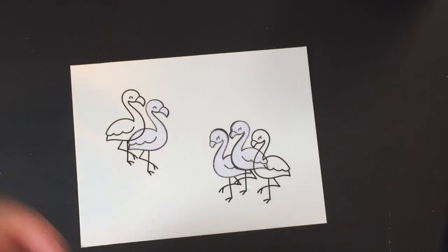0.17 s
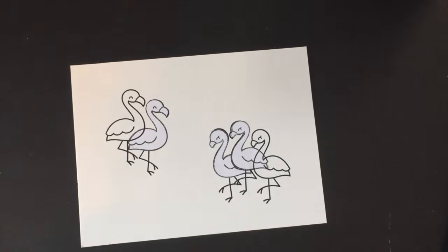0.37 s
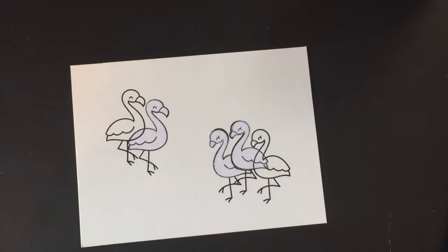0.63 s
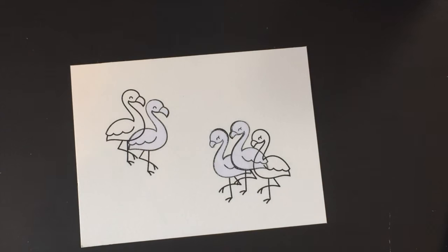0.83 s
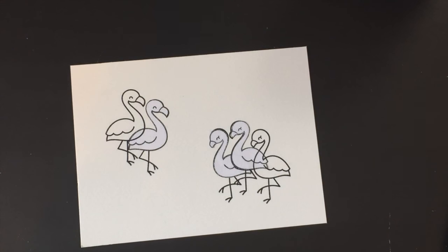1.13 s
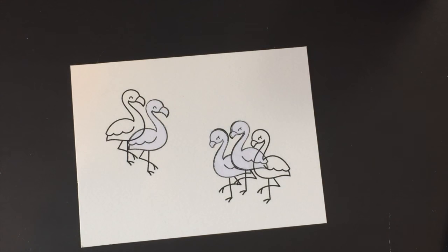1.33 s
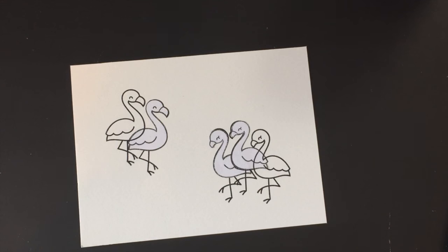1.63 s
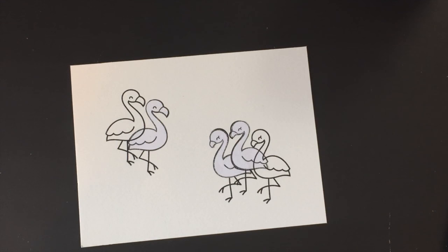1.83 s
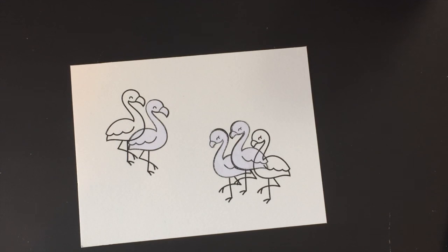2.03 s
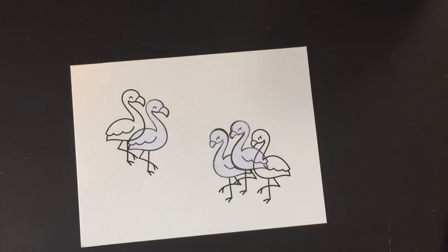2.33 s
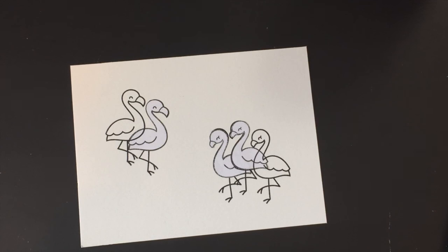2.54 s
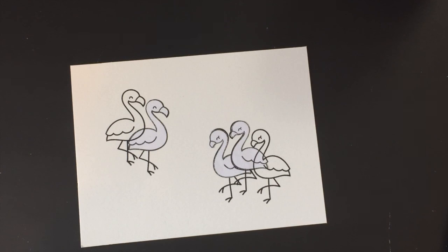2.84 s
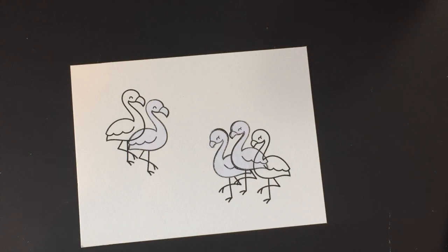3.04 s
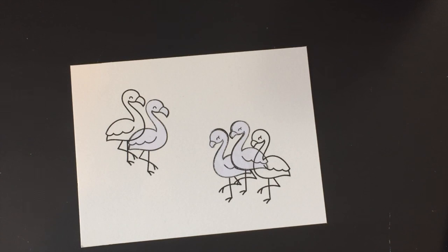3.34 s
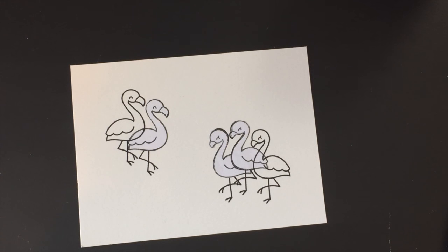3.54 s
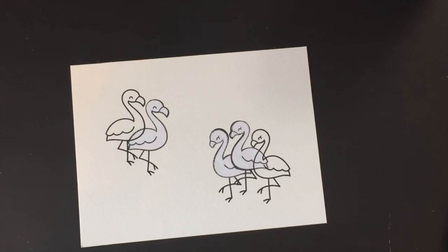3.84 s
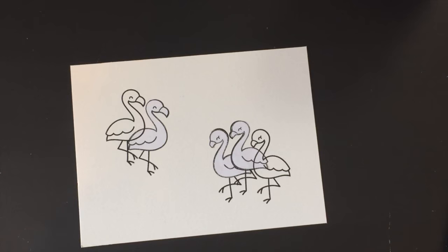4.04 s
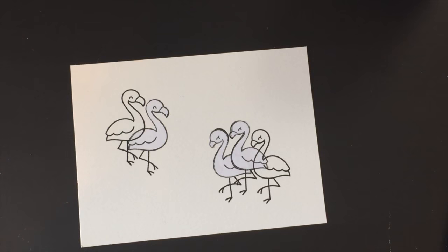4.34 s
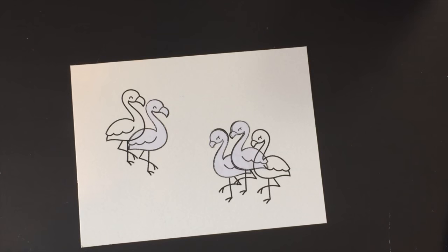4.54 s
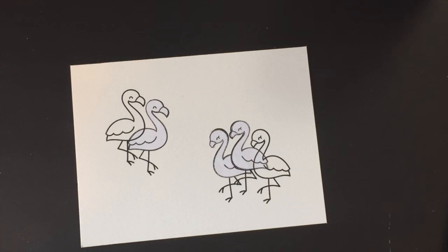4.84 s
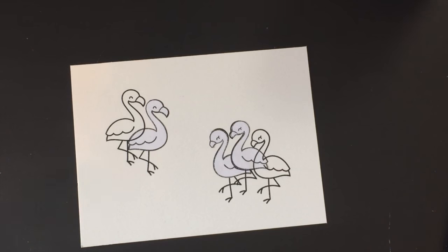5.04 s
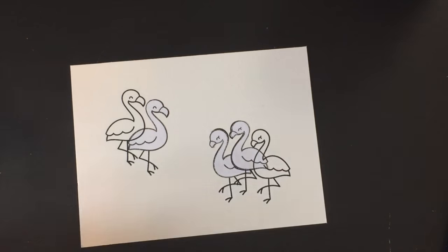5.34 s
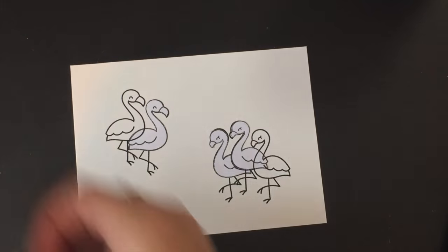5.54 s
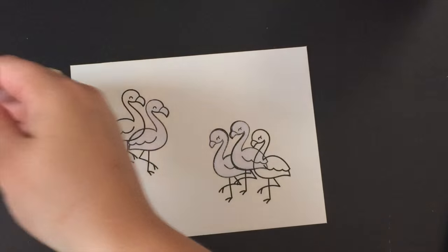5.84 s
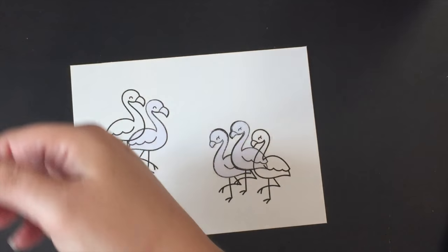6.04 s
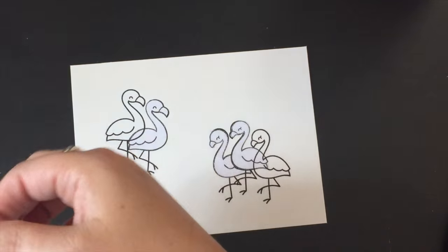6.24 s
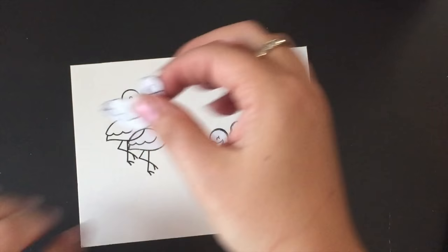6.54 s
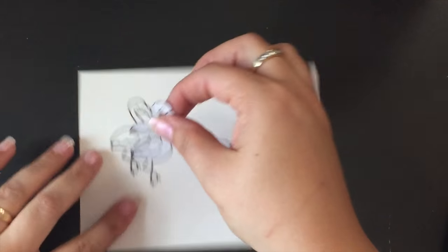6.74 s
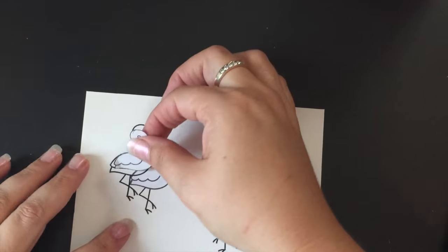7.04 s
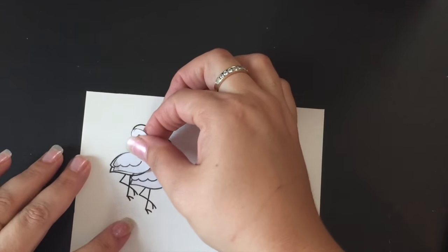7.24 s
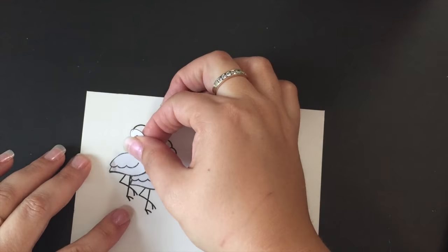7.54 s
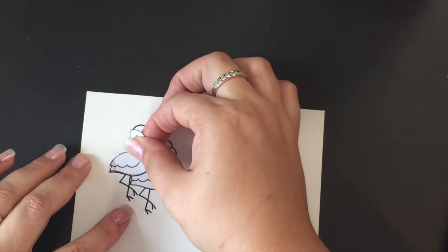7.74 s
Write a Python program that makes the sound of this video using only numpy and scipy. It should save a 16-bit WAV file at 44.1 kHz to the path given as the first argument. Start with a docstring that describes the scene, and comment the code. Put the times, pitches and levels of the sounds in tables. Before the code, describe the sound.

A deep hum of two distant motors throbs about five times a second over soft rumble and faint hiss in a quiet room. Close to a small microphone, a bright paper swish comes early, then mostly only tiny ticks. Around five seconds a small hard tool clicks and knocks sharply; later, sticky paper cut-outs peel with a quick crackle, followed by a bump and light brushing.

```python
"""Paper crafts in a humming room

Two distant motors hum about five hertz apart and throb together, over mains buzz, a drone, rumble and hiss.
Close by, hands work with sticky paper cut-outs: filtered noise makes the sharp snaps and brushing swishes.
Fading sine waves make the knocks of a small tool and two soft bumps on the desk.
A small microphone with gain control turns itself down after the loudest snaps."""
import sys
import numpy as np
from scipy import signal
from scipy.fft import rfft, irfft
from scipy.io import wavfile
from scipy.ndimage import uniform_filter1d

SR = 44100
rng = np.random.default_rng(int(sys.argv[2]) if len(sys.argv) > 2 else 0)


def transcribe(signal):
    """Save signal, clipped to [-1, 1], as a 16-bit WAV file at the path in sys.argv[1]."""
    frames = np.atleast_2d(signal).T
    limited = np.clip(frames, -1, 1)
    pcm = np.round(limited * 32767).astype(np.int16)
    wavfile.write(sys.argv[1], SR, pcm)


N = 347508
TIME = np.arange(N) / SR   # seconds

# shape of the building's rumble, on a relative scale: [f/Hz, level/dB]
RUMBLE_SHAPE = [(20, -11), (38, -7), (46, -15), (68, 4), (82, -2), (91, -3.5), (105, -1), (122, -2),
                (135, -12.5), (200, -13.5), (330, -22.5), (420, -41.5), (700, -31.5), (1500, -42.5)]
# shape of the hiss of air and microphone, on a relative scale: [f/Hz, level/dB]
HISS_SHAPE = [(100, -30), (300, -6), (450, -1), (800, -4.5), (1500, -5.5), (4250, -8.5), (16000, -17)]
# narrow dips in the hiss: [f/Hz, width/Hz, level change/dB]
HISS_DIPS = [(4910, 350, -8.5), (7650, 580, -6), (10460, 1200, -12)]
RUMBLE_DB, HISS_DB = -49.5, -58
GUST_DB, GUST_RATE_HZ = 1.63, 5.5

# swells of a far drone: [t/s of the peak, length/s, peak level/dB]
DRONE_SWELLS = [(0.552, 0.94, -63), (1.708, 1.75, -60), (4.585, 2.8, -64), (5.386, 0.26, -65.5),
                (5.873, 0.4, -60.5), (7.087, 0.76, -59), (7.88, .3, -65)]
DRONE_STEADY_DB = -67

# middle level of the two motor tones: [t/s, slow motor level/dB, fast motor level/dB]
MOTOR_LEVELS = [(0, -38, -42), (.55, -48, -51), (1.05, -45.5, -43), (1.4, -41.5, -45.5),
                (1.75, -39.5, -40.5), (2.25, -39, -41), (2.7, -43, -42), (3.15, -46.5, -39.5),
                (3.6, -40.5, -40), (4.2, -41, -39.5), (4.7, -39.5, -38), (5.3, -46, -40),
                (5.7, -42.5, -39.5), (6.15, -42, -37), (6.6, -42, -39.5), (7.0, -40, -38.5),
                (7.5, -43, -35.5), (7.88, -40, -38)]
SLOW_HZ, FAST_HZ, MAINS_BUZZ_HZ = 54.069, 59.108, 119.83
SLOW_OCTAVE_DB, FAST_OCTAVE_DB, MAINS_BUZZ_DB = -57.5, -55.5, -55
TONE_WAVER_DB, TONE_WAVER_RATE_HZ = 1.0, 3.0
OCTAVE_WAVER_DB, OCTAVE_WAVER_RATE_HZ = 4, 1.8
BUZZ_IN_STEP_S = .45   # buzz and the fast motor's octave swell together here, then every .62 s

# heel of the hand on the desk: [t/s, level/dB added to every desk mode, softness f/Hz]
BUMPS = [(.0, -26.5, 294), (6.771, -36.5, 510)]
# ringing modes of the desk: [f/Hz, relative level/dB, time to fade by 60 dB/s]
DESK_MODES = [(66.5, -8, 0.1), (113, 9, 0.17), (167, -10, 0.1), (215, -3, 0.06), (295, 2, 0.06),
              (400, -6, 0.05), (700, -6, 0.05)]

# fingers brushing paper: [t/s of the peak, rise/s, fall/s, peak level/dB, centre f/Hz, width/octaves]
SWISHES = [(.583, 0.06, 0.025, -45, 8500, 0.45), (.57, .06, .04, -50, 13500, .5),
           (.59, .04, .018, -52, 4600, 1.6), (.595, 0.008, 0.006, -46, 3900, 0.35),
           (.6, .02, .025, -58, 7000, 2.4), (.88, 0.074, .07, -63, 10000, 2.7),
           (1.21, .06, .07, -61, 11000, 1.8), (4.458, 0.03, 0.04, -59, 8500, 2.1),
           (4.595, .05, 0.06, -55, 13000, 0.75), (5.112, 0.032, .018, -54, 6000, 1.8),
           (5.171, 0.018, 0.016, -40, 6000, 3.5), (5.52, .1, .09, -55.5, 2700, 1.2),
           (5.52, .045, .03, -59, 2750, .35), (5.748, 0.034, .027, -49, 10100, 1.5),
           (5.89, 0.022, .02, -55, 12500, .9), (6.39, .05, .05, -54.5, 800, 1.8),
           (6.37, .03, .07, -57, 2600, 1.3), (6.393, .02, .022, -49, 8500, 2.2),
           (6.865, .075, .12, -45, 8500, 1.8), (6.86, .04, .08, -52.5, 3200, 1.5),
           (7.075, 0.06, 0.055, -57.5, 11500, 1.3), (7.197, 0.032, 0.03, -57, 11000, 1.5),
           (7.43, 0.08, 0.07, -57.5, 10000, 1.8)]
GRAIN_DB, GRAIN_RATE_HZ = 1.5, 250

# touches of a small tool: [t/s, level/dB added to every tool mode]
KNOCKS = [(4.9462, -51), (5.164, -44), (5.1672, -38), (5.1697, -33)]
# ringing modes of the tool: [f/Hz, middle relative level/dB, time to fade by 60 dB/s]
TOOL_MODES = [(400, -9, .03), (540, -6, 0.025), (625, -7, 0.045), (860, -9, 0.03), (1240, -4, .03),
              (1750, -3, 0.025), (2020, -5, 0.03), (2343, -5, 0.08), (2443, -12, 0.09), (2720, 8, 0.014),
              (2910, -2, 0.04), (3150, 0, 0.025), (3420, -6, 0.041), (4830, -14, 0.05), (6600, 1.5, 0.018)]
TOOL_SPREAD_DB, TOUCH_RISE_S = 3.3, 0.00035

# snaps of paper and plastic: [t/s, level/dB without the tail, centre f/Hz, width/octaves, rise/s]
SNAPS = [(.097, -54, 9000, 2.1, 0.0026), (0.115, -52, 2190, 1.2, 0.0027), (1.083, -39, 11500, 1.5, 0.002),
         (1.796, -55, 9000, 2.1, 0.0011), (2.614, -54, 9000, 2.7, 0.00092),
         (3.33, -57.5, 1340, 0.31, 0.0038), (4.23, -55, 13000, 1.4, .003), (4.295, -58, 13000, 1.2, 0.0027),
         (4.938, -42, 4500, 3.9, 0.0023), (4.9461, -28.5, 12500, 1.1, 0.0004),
         (4.9462, -30.5, 3050, 0.6, 0.0005), (4.9497, -38, 2800, .6, .001), (5.1104, -44, 5500, 1.3, 0.001),
         (5.1162, -36, 13000, .9, .0008), (5.111, -48, 940, .5, .004), (5.119, -44.5, 766, 0.66, 0.0041),
         (5.116, -34, 5700, 1.6, 0.00088), (5.1641, -29, 10000, 1.8, 0.0004),
         (5.1676, -28, 9000, 2.2, .0008), (5.1695, -29, 3430, 3, 0.0015), (5.1714, -28, 10500, 1.8, .0008),
         (5.1844, -34.5, 5970, 8.5, 0.0033), (5.636, -52, 1410, 0.38, 0.0069),
         (5.753, -46, 8000, 6, 0.0058), (5.876, -40.5, 8800, 0.94, 0.0012),
         (5.899, -46, 11500, 0.82, .0014), (6.36, -52.5, 4000, 1.8, 0.0049),
         (6.386, -38, 8000, 2.1, 0.0008), (6.3895, -39, 14000, .6, .001), (6.395, -39, 6000, 1.2, .0008),
         (6.398, -40, 9000, 2.4, .0008), (6.402, -41, 9000, 3, .0008), (6.4095, -31, 6500, 3.3, 0.0004),
         (6.393, -43, 11000, 1.2, 0.001), (6.4146, -32, 7000, 3.0, 0.0006),
         (6.411, -35.5, 2180, 0.29, 0.00117), (6.4195, -27, 7500, 1.8, 0.0002),
         (6.4377, -25, 7500, 2.6, .0003), (6.4378, -33, 2500, 1.6, .0004), (6.4398, -36, 4000, 2.4, .001),
         (6.765, -35, 6800, 0.42, 0.0004), (6.765, -33, 6000, 6.8, 0.0004)]
SNAP_TAIL_DB, SNAP_TAIL_T60_S = -14.5, 0.091   # level against the crack; time to fade by 60 dB

OPENING_DB, OPENING_S = -6.5, 0.34
BASS_CUT_HZ, TOP_CUT_HZ = 28, 16300


def from_db(db):
    """Turn decibels into a number to multiply the sound by."""
    return 10 ** (np.asarray(db) / 20)


def rms_one(x):
    """Scale a sound so its average strength (rms) is 1."""
    return x / np.sqrt(np.mean(x ** 2) + 1e-20)


def in_time(rows):
    """Draw straight lines between table rows, giving each column a value at every sample."""
    s, *columns = np.transpose(rows)
    return [np.interp(TIME, s, column) for column in columns]


def drift(rate_hz):
    """Random wandering around zero with a spread of about 1, up to roughly the given rate."""
    step = 50   # samples between random points
    sos = signal.butter(2, rate_hz, fs=SR / step, output="sos")
    wander = signal.sosfilt(sos, rng.standard_normal(N // step + 1001))
    points = rms_one(wander[1000:])   # skip the filter's start-up
    return np.interp(np.arange(N) / step, np.arange(len(points)), points)


def coloured(shape):
    """Steady noise with the given balance of low and high pitches, rms 1."""
    hz = np.maximum(np.arange(N // 2 + 1) * SR / N, 1)
    shape_hz, shape_db = np.array(shape).T
    colour = from_db(np.interp(np.log(hz), np.log(shape_hz), shape_db))
    return rms_one(irfft(rfft(rng.standard_normal(N)) * colour, N))


def band_noise(count, hz, octaves, lump_db=3, lump_hz=450):
    """Noise in one band, its spectrum lumpy like that of a small resonant object; rms 1."""
    half_widths = np.array([-.5, .5]) * max(octaves, .1)
    edges = np.clip(hz * 2 ** half_widths, 20, [.4 * SR, .45 * SR])
    sos = signal.butter(2, edges, "band", fs=SR, output="sos")
    noise = signal.sosfilt(sos, rng.standard_normal(count + 500))[500:]   # skip the filter's start-up
    spectrum = rfft(noise)
    spectrum_hz = np.arange(len(spectrum)) * SR / count
    lumps = np.interp(spectrum_hz / lump_hz, np.arange(100), rng.standard_normal(100))
    return rms_one(irfft(spectrum * from_db(lump_db * lumps), count))


def add(out, s, sound):
    """Mix a short sound in at time s, in seconds."""
    i = max(round(s * SR), 0)
    out[i:i + len(sound)] += sound[:N - i]


def air():
    """Smooth hiss with narrow dips, and a low rumble that comes in slight gusts."""
    gusts_db = GUST_DB * drift(GUST_RATE_HZ)
    rumble = from_db(RUMBLE_DB + gusts_db) * coloured(RUMBLE_SHAPE)
    hiss = from_db(HISS_DB) * coloured(HISS_SHAPE)
    for hz, width_hz, db in HISS_DIPS:
        b, a = signal.iirpeak(hz, hz / width_hz, fs=SR)
        narrow_part = signal.lfilter(b, a, hiss)
        hiss = hiss - (1 - from_db(db)) * narrow_part
    return rumble + hiss


def drone():
    """A far drone: noise in a narrow band that swells smoothly out of a steady level."""
    sos = signal.butter(2, [270, 380], "band", fs=SR, output="sos")
    noise = rms_one(signal.sosfilt(sos, rng.standard_normal(N)))
    swells = np.zeros(N)
    for peak_s, length_s, db in DRONE_SWELLS:
        place = np.clip((TIME - peak_s) / length_s, -.5, .5)
        swells += from_db(db) * np.cos(np.pi * place)
    return np.maximum(swells, from_db(DRONE_STEADY_DB)) * noise


def hum():
    """Each motor's rotor gives a tone and its octave; the close tones throb five times a second."""
    # both main tones waver together
    slow_db, fast_db = in_time(MOTOR_LEVELS) + TONE_WAVER_DB * drift(TONE_WAVER_RATE_HZ)
    slow_octave_db = SLOW_OCTAVE_DB + OCTAVE_WAVER_DB * drift(OCTAVE_WAVER_RATE_HZ)
    turn = 2 * np.pi * TIME
    # the rotors start in step
    slow = from_db(slow_db) * np.sin(SLOW_HZ * turn)
    slow = slow + from_db(slow_octave_db) * np.sin(2 * SLOW_HZ * turn)
    fast = from_db(fast_db) * np.sin(FAST_HZ * turn)
    fast = fast + from_db(FAST_OCTAVE_DB) * np.cos(2 * FAST_HZ * turn)
    slip = 2 * np.pi * (MAINS_BUZZ_HZ - 2 * FAST_HZ) * BUZZ_IN_STEP_S
    buzz = from_db(MAINS_BUZZ_DB) * np.cos(MAINS_BUZZ_HZ * turn - slip)
    return -np.sqrt(2) * (slow + fast + buzz)   # root two makes the levels rms


def bumps():
    """A soft push by the hand sets the low modes of the desk ringing."""
    out, t = np.zeros(N), TIME[:SR // 3]
    for s, db, soft_hz in BUMPS:
        rings = np.zeros(len(t))
        for hz, mode_db, t60 in DESK_MODES:
            rings += from_db(mode_db - 60 * t / t60) * np.sin(2 * np.pi * hz * t)
        b, a = signal.butter(1, soft_hz, fs=SR)   # lower means a duller bump
        add(out, s, -from_db(db) * signal.lfilter(b, a, rings))
    return out


def swishes():
    """Rubbing noise that swells and fades with the stroke, grainy as the skin catches."""
    out, t = np.zeros(N), TIME[:SR // 4]
    grain = from_db(GRAIN_DB * drift(GRAIN_RATE_HZ))
    for peak_s, rise_s, fall_s, db, hz, octaves in SWISHES:
        ramp = np.interp(t, [0, rise_s, rise_s + fall_s], [0, 1, 0])
        stroke = np.sin(np.pi / 2 * ramp) ** 1.8   # rounds the ramp
        add(out, peak_s - rise_s, from_db(db) * stroke * band_noise(len(t), hz, octaves))
    return out * grain


def knocks():
    """A small hard tool touches down; every touch rings its modes with new random strengths."""
    out, t = np.zeros(N), TIME[:SR // 6]
    touch = np.clip(t / TOUCH_RISE_S, 0, 1)
    for s, db in KNOCKS:
        strengths_db = rng.normal(0, TOOL_SPREAD_DB, len(TOOL_MODES))
        turns = rng.random(len(TOOL_MODES))   # where in its cycle each mode starts
        for (hz, mode_db, t60), extra_db, turn in zip(TOOL_MODES, strengths_db, turns):
            fade = from_db(db + mode_db + extra_db - 60 * t / t60)
            add(out, s, fade * np.sin(2 * np.pi * (hz * t + turn)) * touch)
    return out


def snaps():
    """Coloured noise rises in milliseconds or less and cracks off, with a weaker tail from desk and walls."""
    out, t = np.zeros(N), TIME[:SR // 8]
    for s, db, hz, octaves, rise_s in SNAPS:
        rise = np.clip(t / max(rise_s, 1e-4), 0, 1) ** 0.77
        after = np.maximum(t - rise_s, 0)
        crack = from_db(-60 * after / (.004 + 3 * rise_s))   # a slower snap also lets go more slowly
        tail = from_db(SNAP_TAIL_DB - 60 * after / SNAP_TAIL_T60_S)
        envelope = from_db(db) * rise * (crack + tail)
        add(out, s - rise_s, envelope * band_noise(len(t), hz, octaves))
    return out


def scene():
    """Everything reaches one microphone; the level starts a little lower and comes up."""
    opening_db = OPENING_DB * np.exp(-(TIME / OPENING_S) ** 2)
    background = air() + drone() + hum()
    hands = bumps() + swishes() + knocks() + snaps()
    return (from_db(opening_db) * (background + hands))[None]   # one channel


def gain_control(x, threshold_db=-39, slope=0.44, release_db_s=14):
    """Bright peaks above a threshold pull the gain down; it then creeps back by some dB per second."""
    bright = signal.sosfilt(signal.butter(2, 800, "high", fs=SR, output="sos"), x)
    power = uniform_filter1d(bright ** 2, size=440)   # averaged over 10 ms
    level_db = 10 * np.log10(power + 1e-12)
    wanted_cut_db = slope * (level_db - threshold_db)
    # hold the largest cut so far while it shrinks at the release rate
    ramp = release_db_s * TIME
    cut_db = np.maximum.accumulate(wanted_cut_db + ramp, axis=1) - ramp
    lag = np.exp(-1 / (0.032 * SR))   # the gain follows with a 32 ms lag
    smooth_cut_db = signal.lfilter([1 - lag], [1, -lag], np.maximum(cut_db, 0))
    return x * from_db(-smooth_cut_db)


def record(dry):
    """The microphone cuts the deep bass, controls the gain, then cuts the top steeply."""
    bass_cut = signal.butter(2, BASS_CUT_HZ, "high", fs=SR, output="sos")
    top_cut = signal.cheby2(14, 55, TOP_CUT_HZ, fs=SR, output="sos")
    levelled = gain_control(signal.sosfilt(bass_cut, dry))
    return signal.sosfilt(top_cut, levelled)


dry = scene()
out = record(dry)
transcribe(out)
```